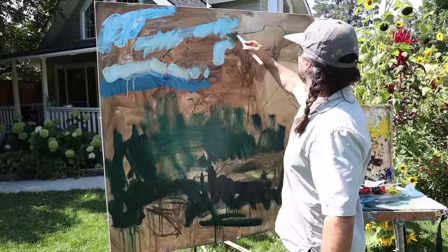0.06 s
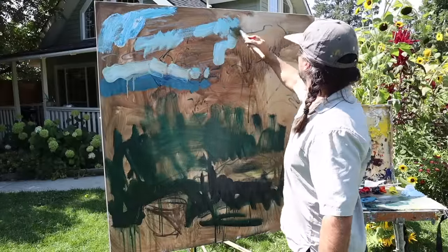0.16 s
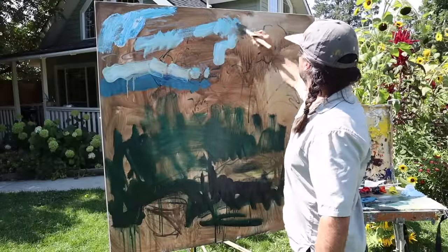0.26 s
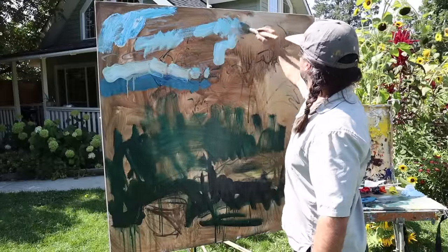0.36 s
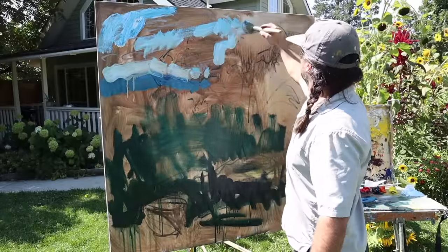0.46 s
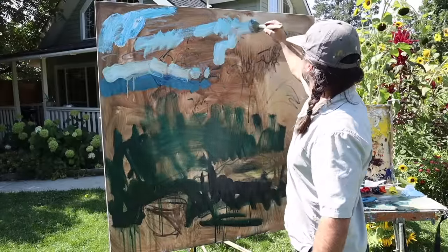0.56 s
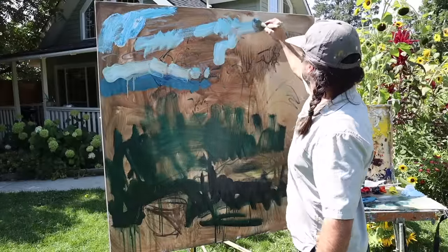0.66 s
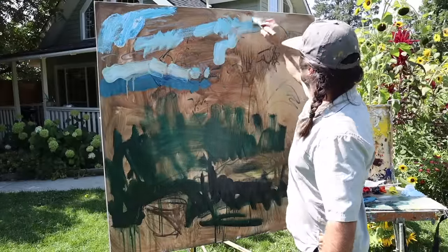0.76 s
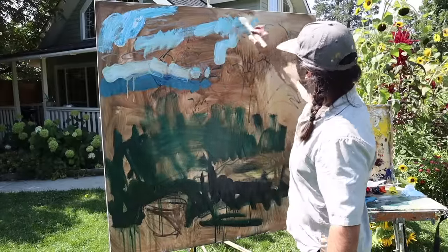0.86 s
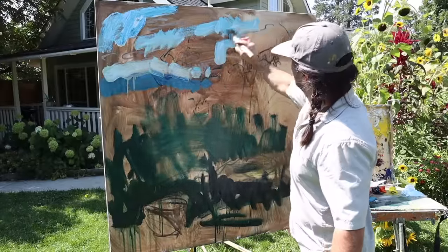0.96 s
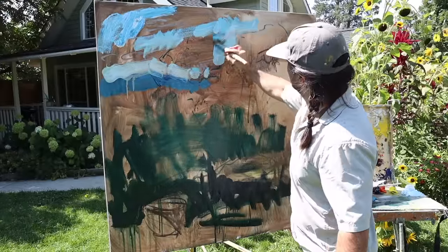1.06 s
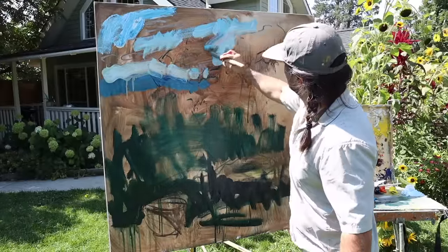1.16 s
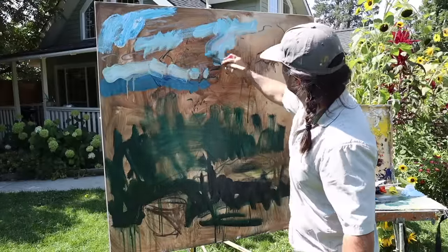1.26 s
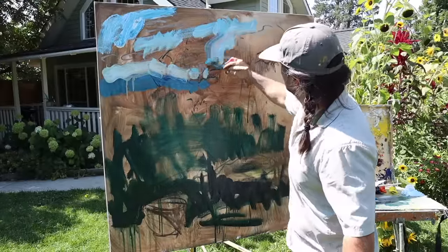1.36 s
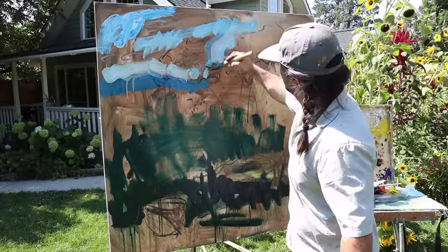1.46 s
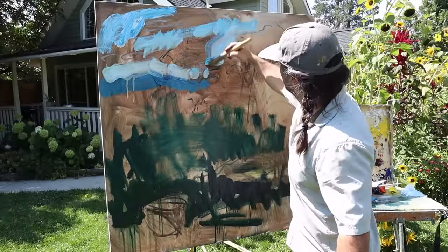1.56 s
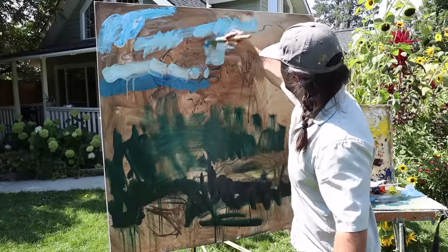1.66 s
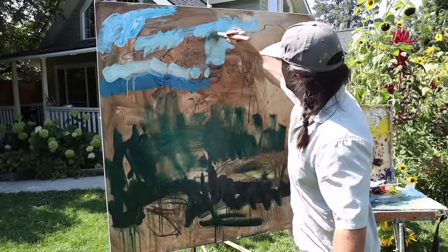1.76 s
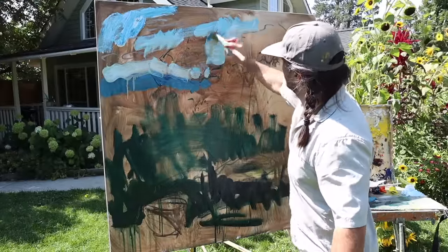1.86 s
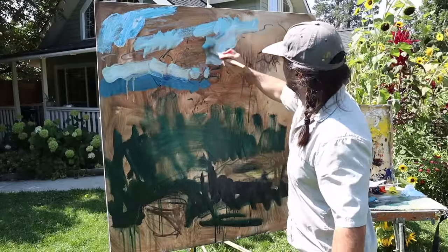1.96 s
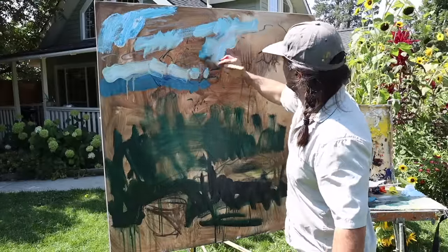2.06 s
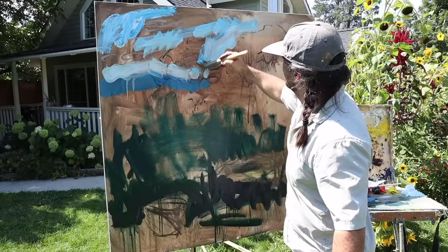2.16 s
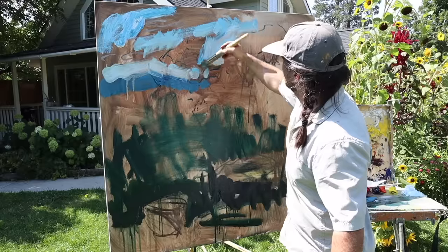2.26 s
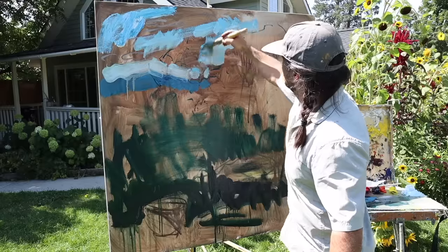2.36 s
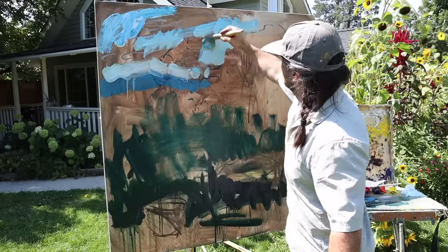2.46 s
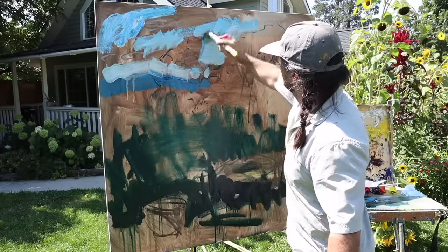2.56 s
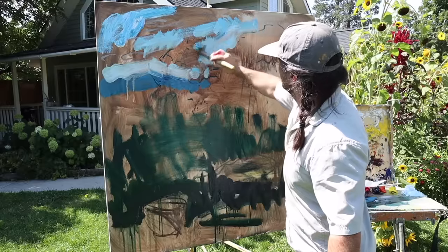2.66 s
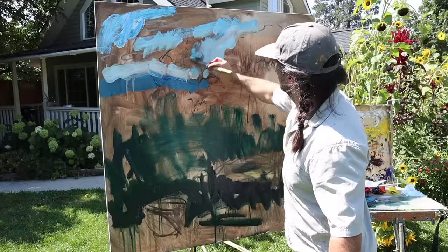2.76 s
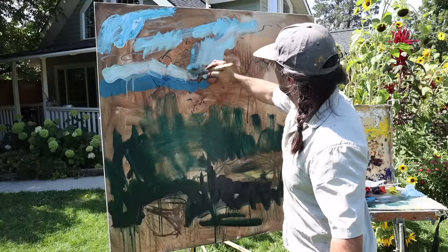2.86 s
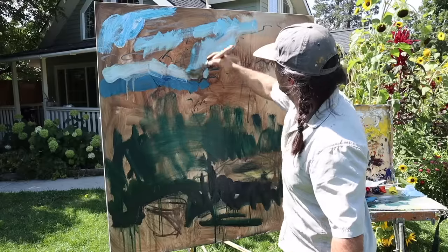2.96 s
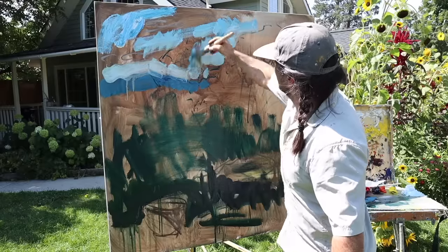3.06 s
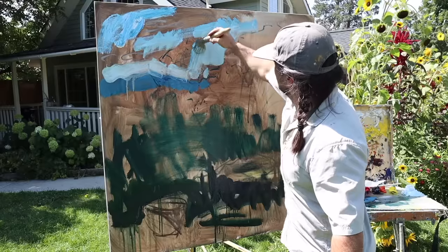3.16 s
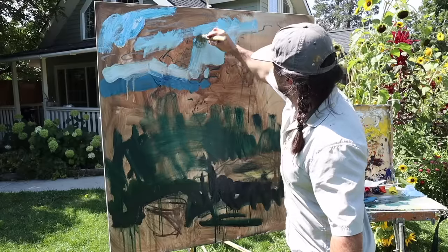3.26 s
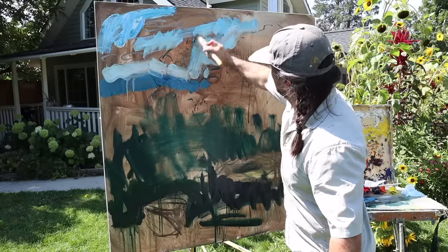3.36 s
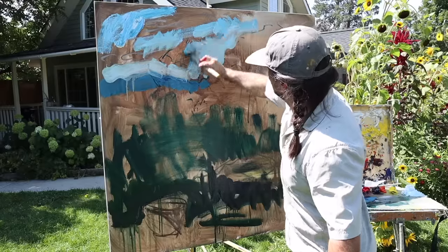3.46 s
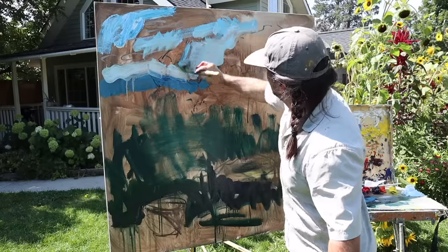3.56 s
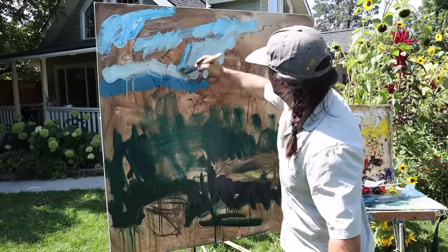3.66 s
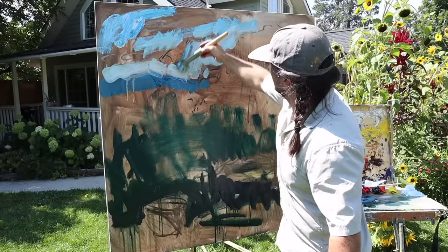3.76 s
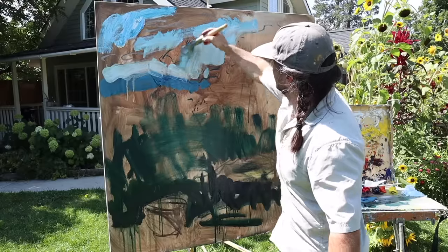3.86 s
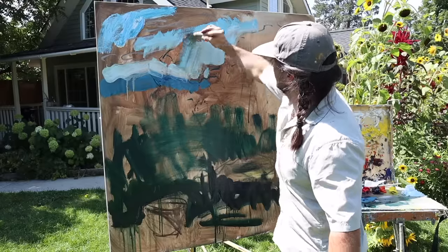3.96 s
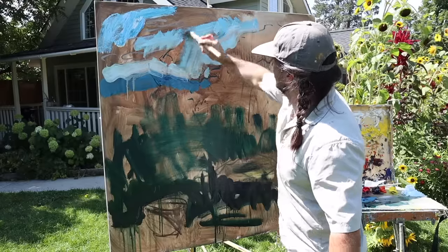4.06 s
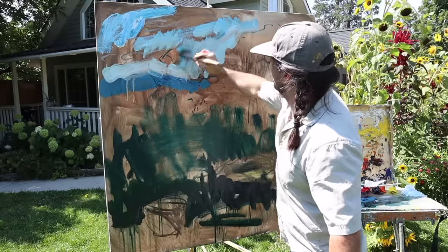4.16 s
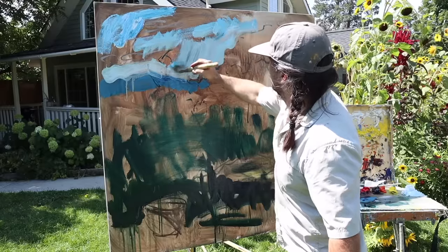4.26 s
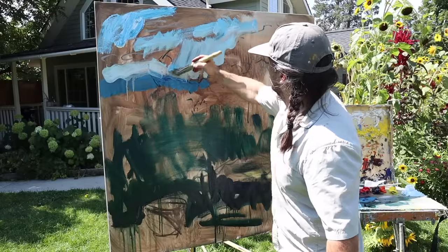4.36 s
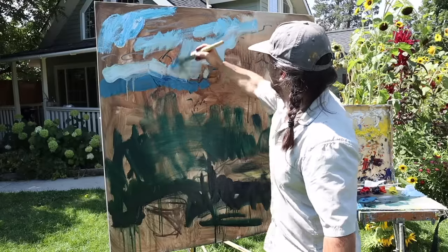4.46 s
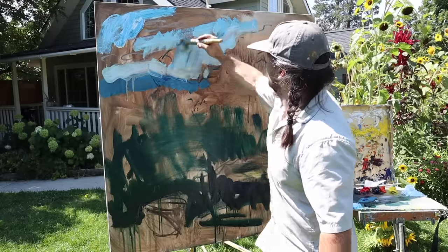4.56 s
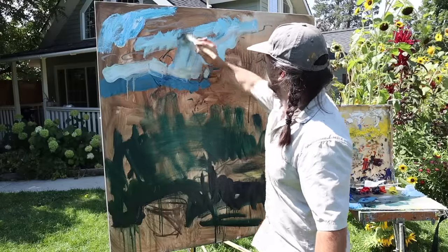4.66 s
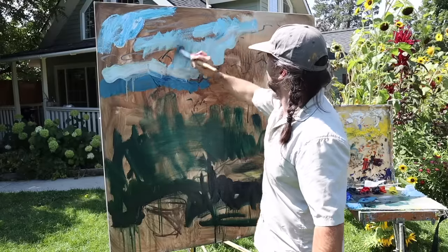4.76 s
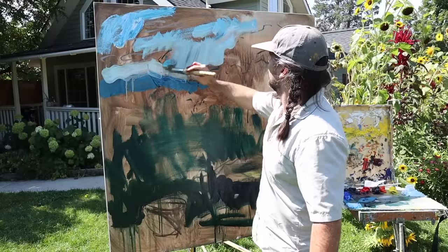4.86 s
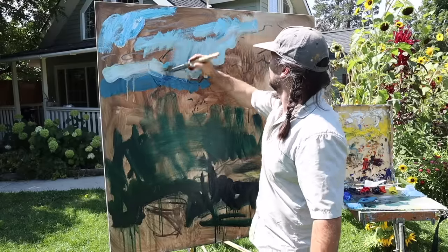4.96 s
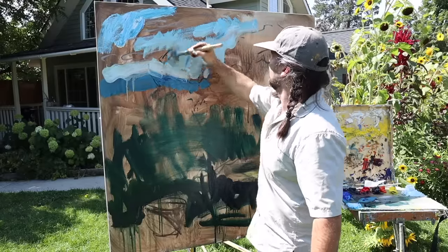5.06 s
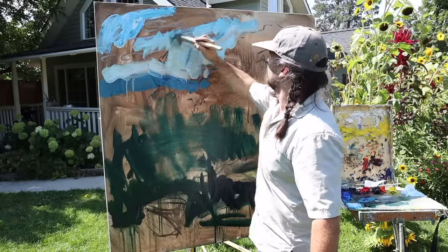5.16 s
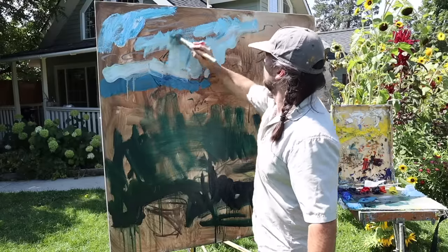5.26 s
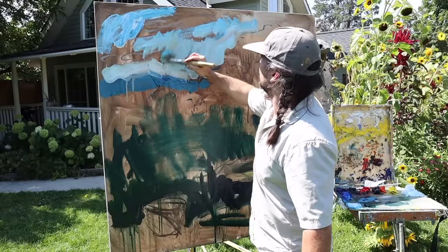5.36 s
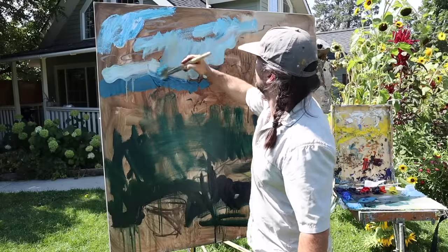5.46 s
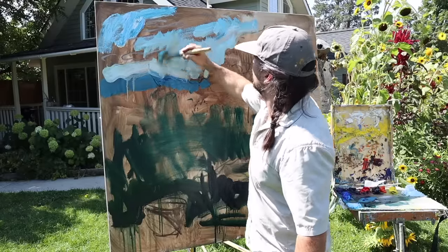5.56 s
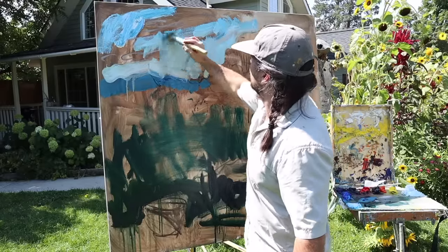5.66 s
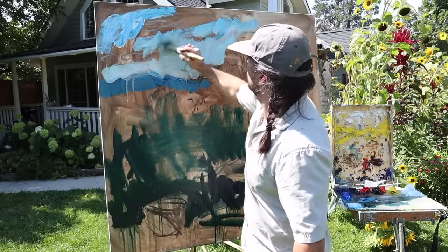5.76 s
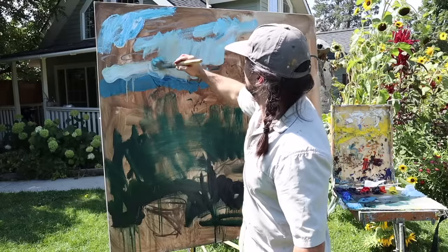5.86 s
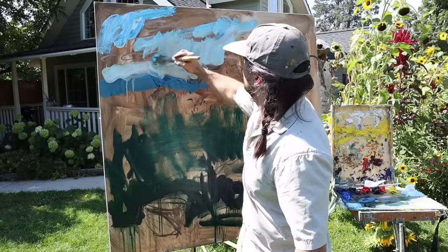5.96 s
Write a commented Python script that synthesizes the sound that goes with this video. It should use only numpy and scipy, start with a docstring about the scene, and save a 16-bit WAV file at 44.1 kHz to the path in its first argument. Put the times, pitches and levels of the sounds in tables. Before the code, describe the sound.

Dry brush strokes rasp and hiss on taut cloth, growing harder and quicker, with soft drummy canvas thuds and a quiet garden hum behind.

```python
"""In a garden, a bristle brush scrubs paint onto a large stretched canvas: light sweeps, then hard strokes back and forth.
Bristles flicking over the weave are random clicks, coloured as cloth rasp, tuft rasp, tip-first bite and hiss.
Landings ring the canvas's drum modes, short noise bursts tick, and low noise makes the sheet wobble on its frame.
A low, almost steady hum of far traffic and air lies behind; one microphone feeds both channels."""
import sys
import numpy as np
from scipy import signal
from scipy.fft import rfft, irfft, next_fast_len
from scipy.io import wavfile
from scipy.ndimage import uniform_filter1d

SR = 44100
rng = np.random.default_rng(int(sys.argv[2]) if len(sys.argv) > 2 else 0)


def int16_out(signal):
    """Quantize to a 16-bit WAV file."""
    q = np.round(np.clip(np.atleast_2d(signal).T, -1, 1) * 32767)
    wavfile.write(sys.argv[1], SR, q.astype(np.int16))


N = 265923
TIME = np.arange(N) / SR   # s


def from_db(db):
    """Decibels to amplitude gain."""
    return 10 ** (np.asarray(db) / 20)


def rms_one(x):
    """Scale to unit rms."""
    return x / np.sqrt(np.mean(x ** 2) + 1e-20)


def colour(x, spectrum, resonances=()):
    """Give a steady sound a broad spectrum with resonant humps, falling away below its first point; rms 1."""
    size = next_fast_len(N)
    hz = np.maximum(np.arange(size // 2 + 1) * SR / size, 1)
    points = np.array(spectrum)
    db = np.interp(np.log(hz), np.log(points[:, 0]), points[:, 1])
    for centre_hz, width_hz, lift_db in resonances:
        db = db + lift_db / (1 + (2 * (hz - centre_hz) / width_hz) ** 2)
    below = np.minimum(hz / points[0, 0], 1) ** 2
    shaped = rfft(x, size) * from_db(db) * below
    return rms_one(irfft(shaped, size)[:N])


def surges(events, rise_s, fall_s):
    """A brief swell at each event, rising and falling exponentially around its peak."""
    out = np.zeros(N)
    for peak_s, level_db, *_ in events:
        shape = np.exp(-np.maximum((peak_s - TIME) / rise_s, (TIME - peak_s) / fall_s))
        out += from_db(level_db) * shape
    return out


# Brush strokes; levels are before the trims set in scene(). Columns: start_s [s], attack_s [s],
# length_s [s], release_s [s], rasp_db [dB], sag_db [dB fall over the stroke],
# hiss_db [dB re rasp], drive_db [dB into the cloth], bite_db [dB, bristles pushed tip first]
BRUSH_STROKES = [ (0.0, 0.0033, .25, 0.035, -55.5, -0.5, -1.5, 4.5, -2),
                 (0.284, 0.01, 0.062, 0.011, -53.5, -3.5, 0, -1, -15.5),
                 (0.4, 0.0094, 0.078, 0.018, -51.5, 4, -0.5, 7.5, -16),
                 (0.523, 0.02, 0.18, 0.0084, -47, 8, 0, 3, -20), (0.77, .012, .06, .025, -69, 6, 9, -4, -7),
                 (1.05, 0.018, 0.14, 0.041, -41, 3.5, 2, 2, -11),
                 (1.326, 0.019, 0.13, 0.017, -49, 8, -1, -4, -8),
                 (1.575, 0.013, 0.17, .014, -54.5, -6, -10, 2.5, -17),
                 (2.037, 0.0041, 0.2, 0.011, -49, 4.5, -2.5, 1, 1),
                 (2.383, 0.017, 0.18, 0.045, -47.5, 9, -6, 1.5, -3.5),
                 (2.778, 0.0097, 0.17, 0.011, -48.5, 1.5, -0.5, 3.5, -1),
                 (3.128, 0.019, 0.12, 0.016, -39.5, 7, -8.5, -3.5, -0.5),
                 (3.244, 0.032, 0.1, .02, -58.5, -1, -3, -3, -6),
                 (3.486, 0.0032, 0.17, 0.022, -40.5, -0.5, -5, -4, -5),
                 (3.862, 0.029, 0.16, 0.029, -48, 0.5, -2.5, 6, -2),
                 (4.205, 0.0065, 0.15, 0.012, -42.5, .5, -1, 2.5, -4),
                 (4.556, 0.0093, 0.13, 0.024, -36, 6.5, -6.5, -3.5, 4.5),
                 (4.842, 0.0042, 0.14, 0.012, -33, 8, -2.5, 1, 0.5),
                 (5.044, 0.011, 0.085, 0.023, -51.5, -2, -5, 3, -7.5),
                 (5.131, 0.0076, 0.098, 0.018, -29.5, 0, -12.5, -4.5, -19),
                 (5.316, .004, .02, 0.0051, -58, 4, 3, 4.5, -17),
                 (5.392, 0.014, 0.11, 0.0066, -25.5, 7, -7, -2, 5),
                 (5.613, 0.025, 0.1, 0.016, -25, 11, -10.5, 1.5, -13),
                 (5.834, .013, 0.1, 0.0085, -27, 4.5, -6, .5, 1),
                 (6.014, 0.0079, .08, 0.024, -44, 2, -6, 7, 2.5), ]
# The brush lands on the cloth; levels are before the trims. Columns: peak_s [s], rise_s [s],
# slap_db [dB], hiss_db [dB re slap], thud_db [dB]
BRUSH_LANDINGS = [(2.032, 0.016, -42.5, -8.5, -39), (2.425, .012, -37.5, -9, -33.5),
                  (2.736, 0.016, -38.5, 0, -44.5), (3.134, 0.0038, -31.5, -16, -35),
                  (3.49, 0.0047, -42, -29, -50), (3.885, 0.0135, -40, -17, -35),
                  (4.207, 0.0022, -47, -22, -28.5), (4.566, 0.0065, -30.5, -14, -39),
                  (4.842, 0.0022, -42.5, -25, -33), (5.14, 0.00198, -39.5, -10, -36)]
BRIGHTEN_DB = 1   # the hiss gains on the rasp from the start of a stroke to its end
SLAP_FALL_S = 0.014   # the slap dies as the tuft flattens
# between strokes the tips still graze the cloth, more so in hard scrubbing
GRAZE_DB, GRAZE_HISS_DB, GRAZE_FOLLOWS = -60.5, -8.5, 0.48   # dB, dB re graze, dB per dB of effort


def hand():
    """Strength of rasp and of hiss: each stroke swells, sags or grows, and lets go; a landing adds a short slap."""
    rasp, hiss = np.zeros(N), np.zeros(N)
    for start_s, attack_s, length_s, release_s, rasp_db, sag_db, hiss_db, _, _ in BRUSH_STROKES:
        age = TIME - start_s
        along = np.clip(age / length_s, 0, 1)
        swell = -np.logaddexp(0, -age / attack_s)
        let_go = -np.logaddexp(0, (age - length_s) / release_s)
        stroke = np.exp(swell + let_go) * from_db(rasp_db - sag_db * along)
        rasp += stroke
        hiss += stroke * from_db(hiss_db + BRIGHTEN_DB * (along - .5))
    for peak_s, rise_s, slap_db, hiss_db, _ in BRUSH_LANDINGS:
        slap = surges([(peak_s, slap_db)], rise_s, SLAP_FALL_S)
        rasp += slap
        hiss += slap * from_db(hiss_db)
    effort = uniform_filter1d(rasp, size=13000) + 1e-6   # mean over about 0.3 s
    graze = from_db(GRAZE_DB) * (effort / np.median(effort)) ** GRAZE_FOLLOWS
    return np.hypot(rasp, graze), np.hypot(hiss, graze * from_db(GRAZE_HISS_DB))


def grip():
    """Drive and bite: the angle of the brush turns smoothly from the middle of one stroke to the next."""
    start_s, _, length_s, *_, drive_db, bite_db = np.transpose(BRUSH_STROKES)
    middle_s = start_s + length_s / 2
    return [from_db(np.interp(TIME, middle_s, db)) for db in (drive_db, bite_db)]


def flicks(per_s, spread_db):
    """Bristles catch on the weave and spring free: dense clicks of uneven size; rms 1."""
    sizes = from_db(spread_db * np.minimum(rng.exponential(1, N), 4))
    signs = rng.choice([-1, 1], N)
    happens = rng.random(N) < per_s / SR
    return rms_one(sizes * signs * happens / np.sqrt(per_s))   # denser clicks are smaller


# Colour of the rubbed cloth. Columns: pitch_hz [Hz], level_db [dB per Hz]
CLOTH_COLOUR = [(130, -12.5), (260, 0.5), (400, 3), (600, 3.5), (950, -8), (1250, -5.5), (1600, -3),
                (2100, -4.5), (2800, 1), (4500, -12.5), (9000, -22)]
# Resonances of the cloth. Columns: pitch_hz [Hz], width_hz [Hz], lift_db [dB]
CLOTH_RESONANCES = [(238, 30, 1), (353, 23, 2), (500, 41, 0.5), (873, 71, 6), (1197, 12, 14),
                    (1540, 260, 7.5), (1720, 52, 3.5), (2460, 810, 1.5)]
# Colour of the tuft's rasp. Columns: pitch_hz [Hz], level_db [dB per Hz]
TUFT_COLOUR = [(500, -10), (1200, -2.5), (1600, -4.5), (2100, -2.5), (3000, -4), (3900, -0.5), (4600, -5.5),
               (6000, -12), (9000, -26), (15000, -50)]
# Resonances of the tuft. Columns: pitch_hz [Hz], width_hz [Hz], lift_db [dB]
TUFT_RESONANCES = [(1610, 200, 4.7), (2780, 39, 0.68), (2930, 18, 0.84), (3060, 21, 10.4), (3295, 120, 5.1),
                   (3590, 350, 4.3)]
# Colour of the bite of bristles pushed tip first. Columns: pitch_hz [Hz], level_db [dB per Hz]
BITE_COLOUR = [(2400, -7.5), (3200, 1.5), (4000, 0.5), (4800, -2.5), (6500, -5.5), (9000, -12.5),
               (15000, -28)]
# Colour of the bristle hiss. Columns: pitch_hz [Hz], level_db [dB per Hz]
HISS_COLOUR = [(1000, -8), (3000, -4), (4600, -1), (6200, -1), (8000, 0.5), (10500, -0.5), (13000, -3.5),
               (16000, -7.5)]


def brush(rasp, hiss, cloth_db, rasp_db, bite_db, hiss_db, snap_db, damped_hz):
    """Harder strokes pluck more bristles. A flat, pressed tuft drives the cloth; on its tips it bites and hisses."""
    drive, push = grip()
    force = rasp / rasp.max()
    on_tips = np.clip(hiss / rasp / from_db(-8), .3, 3)   # 1 where hiss lies 8 dB under rasp
    per_s = 3500 + 9000 * np.sqrt(force)
    packed = np.sqrt(force)   # pressure packs the bristles together
    # in a loose tuft single bristles snap free
    snaps = from_db(snap_db) * (1 - packed) * flicks(110, spread_db=2.5)

    cloth_rub = colour(flicks(per_s, spread_db=2.5), CLOTH_COLOUR, CLOTH_RESONANCES)
    cloth = drive * rasp / on_tips ** 0.28 * cloth_rub
    tuft_rub = colour(flicks(per_s, spread_db=2.5) + snaps, TUFT_COLOUR, TUFT_RESONANCES)
    tuft = rasp * on_tips ** 0.031 * tuft_rub
    bite = push * rasp * colour(flicks(per_s, spread_db=3.0), BITE_COLOUR, TUFT_RESONANCES)

    # a packed tuft damps the highest part of the hiss
    free = colour(flicks(2 * per_s, spread_db=1.5) + snaps, HISS_COLOUR, [(7900, 330, 2.7)])
    low_pass = signal.butter(1, damped_hz, fs=SR, output="sos")
    damped = rms_one(signal.sosfilt(low_pass, free))
    tips = hiss * ((1 - packed) * free + packed * damped)

    on_cloth = from_db(cloth_db) * cloth + from_db(rasp_db) * tuft
    return on_cloth + from_db(bite_db) * bite + from_db(hiss_db) * tips


# The brush ticks as it turns or stabs the cloth. Columns: peak_s [s], level_db [dB before the trim]
TICK_TIMES = [(1.2974, -37), (2.978, -33), (2.9981, -34.5), (3.1352, -19), (3.712, -34), (4.042, -34.5),
              (4.3912, -35.5), (5.2855, -25.5)]
# Colour of a tick. Columns: pitch_hz [Hz], level_db [dB per Hz]
TICK_COLOUR = [(600, -5), (2000, 1.5), (3300, 3), (4600, -1.5), (6000, -10.5), (10000, -19), (16000, -26)]


def ticks(tick_db):
    """Small dry noise bursts that die within milliseconds."""
    bursts = surges(TICK_TIMES, rise_s=0.00025, fall_s=0.0045)
    return from_db(tick_db) * bursts * colour(rng.standard_normal(N), TICK_COLOUR)


def ring(clicks, hz, t60_s):
    """A damped resonator: a unit click sets a sine of height 1 ringing, 60 dB down after t60_s."""
    decay = from_db(-60 / (t60_s * SR))
    turn = 2 * np.pi * hz / SR
    return signal.lfilter([0, np.sin(turn)], [1, -2 * decay * np.cos(turn), decay * decay], clicks + 1e-18)


# Drum modes of the canvas. Columns: pitch_hz [Hz], level_db [dB, relative], t60_s [s]
DRUM_MODES = [(64, -29, .2), (92.5, 1, 0.17), (124, -1, 0.042), (160, 1, 0.19), (178, 4.5, 0.15),
              (219.6, 4, 0.13), (270, 3.5, 0.098), (331, -2.5, 0.087), (366, -4, 0.26), (473, -1.5, 0.079)]


def thuds(thud_db, lean, rough):
    """The soft tuft leans into the membrane over some milliseconds and sets its drum modes ringing."""
    # the push peaks one rise time ahead of the slap
    pushes = [(peak_s - rise_s, db) for peak_s, rise_s, *_, db in BRUSH_LANDINGS]
    push = surges(pushes, rise_s=0.0022, fall_s=0.0091)
    shove = from_db(thud_db) * push * (lean + rough * rng.standard_normal(N))
    out = np.zeros(N)
    for k, (hz, mode_db, t60_s) in enumerate(DRUM_MODES):
        out += (-1) ** k * from_db(mode_db) * ring(shove, hz, t60_s)   # modes alternate in sign
    return out


def sway(spectrum):
    """Low random motion of the membrane, kept even by its inertia."""
    motion = colour(rng.standard_normal(N), spectrum, [(72.7, 20, 13.0)])
    return motion / np.sqrt(uniform_filter1d(motion ** 2, size=2500) + 0.04)


# The canvas heaves on its frame; levels are before the trims. Columns: centre_s [s],
# half_length_s [s], swing_db [dB, the whole sheet], flutter_db [dB, its higher modes]
CANVAS_HEAVES = [(0.05, .07, -45.5, -44.5), (2.13, 0.087, -48, -52), (2.367, 0.11, -41.5, -40.5),
                 (2.696, 0.055, -42.5, -41.5), (2.896, 0.057, -42.5, -47.5), (3.322, 0.058, -40, -43.5),
                 (3.717, 0.074, -49, -51), (4.017, 0.064, -46, -47), (4.286, 0.14, -43.5, -44),
                 (4.534, 0.049, -34, -40.5), (4.863, 0.23, -39.5, -47), (5.106, 0.019, -37, -46),
                 (5.9, 0.082, -41, -68)]
# Colour of the whole sheet's swing. Columns: pitch_hz [Hz], level_db [dB per Hz]
SWING_COLOUR = [(20, -28), (34, -28), (48, 3.5), (66, -4.5), (85, -6.5), (110, -20), (200, -64.5)]
# Colour of the higher modes' flutter. Columns: pitch_hz [Hz], level_db [dB per Hz]
FLUTTER_COLOUR = [(75, -14), (98, 1.5), (125, 4), (185, -5.5), (230, -14), (320, -17.5), (600, -59)]
REST_SWING_DB, REST_FLUTTER_DB = -59.5, -49   # before the trims: the sheet is never quite still
SWING_FOLLOWS, FLUTTER_FOLLOWS = 0.16, 0.13   # dB of motion per dB of rubbing


def wobble(rasp, swing_db, flutter_db):
    """Rubbing keeps the big membrane astir; now and then it heaves on its frame and settles again."""
    rubbing = rasp / np.median(rasp)
    swing = from_db(REST_SWING_DB) * rubbing ** SWING_FOLLOWS
    flutter = from_db(REST_FLUTTER_DB) * rubbing ** FLUTTER_FOLLOWS
    for centre_s, half_length_s, whole_db, higher_db in CANVAS_HEAVES:
        swell = np.exp(-.5 * ((TIME - centre_s) / half_length_s) ** 2)
        swing = np.hypot(swing, from_db(whole_db) * swell)
        flutter = np.hypot(flutter, from_db(higher_db) * swell)
    whole_sheet = from_db(swing_db) * swing * sway(SWING_COLOUR)
    higher_modes = from_db(flutter_db) * flutter * sway(FLUTTER_COLOUR)
    return whole_sheet + higher_modes


def drift(rate_hz):
    """Slow random wandering of spread 1: noise through a two-pole low-pass, drawn every 40 samples."""
    step = 40
    pole = np.exp(-2 * np.pi * rate_hz * step / SR)
    noise = rng.standard_normal(N // step + 2002)
    slow = signal.lfilter([1], [1, -2 * pole, pole * pole], noise)[2000:]   # skip the settling
    return np.interp(np.arange(N) / step, np.arange(len(slow)), rms_one(slow))


# Colour of the garden's hum. Columns: pitch_hz [Hz], level_db [dB per Hz]
GARDEN_COLOUR = [(25, -16), (45, -1), (65, -1), (130, -2), (190, 0), (250, -4), (400, -7), (700, -10),
                 (1050, -14), (1600, -17), (2300, -23), (3800, -23), (4600, -28), (9000, -34),
                 (15600, -38.5)]


def garden(level_db, waver_db):
    """Far traffic and air: a smooth low hum of coloured noise whose level wavers slightly."""
    air = colour(rng.standard_normal(N), GARDEN_COLOUR, [(3350, 320, 2.6)])
    return from_db(level_db + waver_db * drift(0.33)) * air


def scene():
    """Brush, canvas and garden, the same in both channels."""
    rasp, hiss = hand()
    rubbing = brush(rasp, hiss, cloth_db=-3.5, rasp_db=-3.0, bite_db=-3, hiss_db=2.0,
                    snap_db=-4.5, damped_hz=7040)
    membrane = thuds(thud_db=-30.0, lean=0.4, rough=0.82) + wobble(rasp, swing_db=-0.5, flutter_db=-1.0)
    mono = rubbing + membrane + ticks(tick_db=-9.0) + garden(level_db=-47.5, waver_db=0.65)
    return np.tile(mono, (2, 1))


CUTOFF_HZ = 15600


def record(dry):
    """The microphone signal's top is cut steeply by an elliptic low-pass."""
    low_pass = signal.ellip(12, .1, 90, CUTOFF_HZ, fs=SR, output="sos")   # ripple .1 dB, stop 90 dB
    return signal.sosfilt(low_pass, dry)


dry = scene()
out = record(dry)
int16_out(out)
```